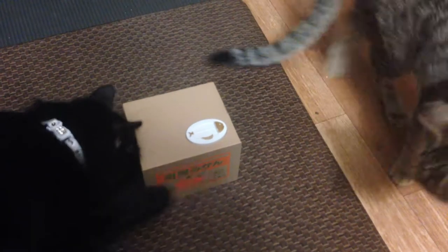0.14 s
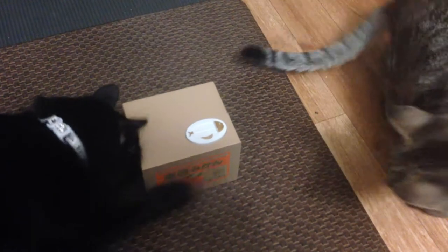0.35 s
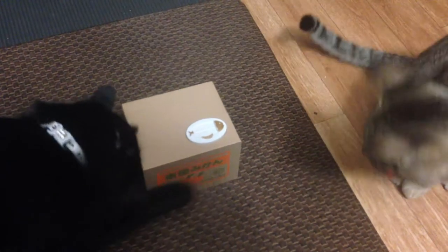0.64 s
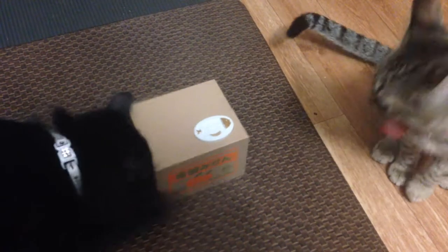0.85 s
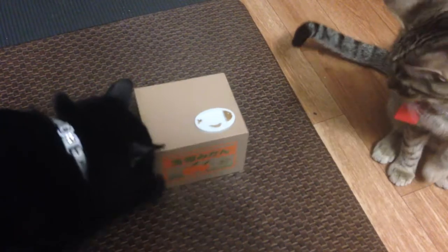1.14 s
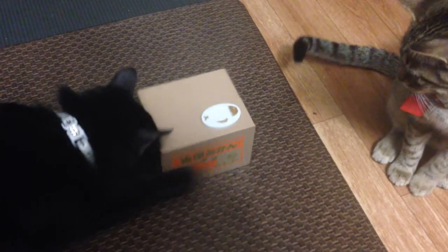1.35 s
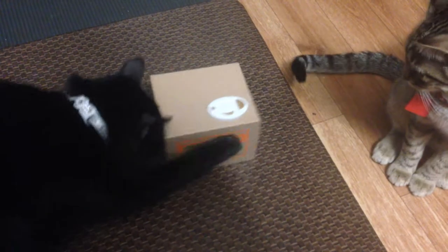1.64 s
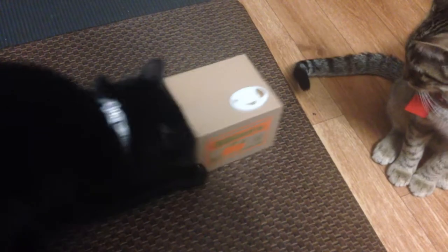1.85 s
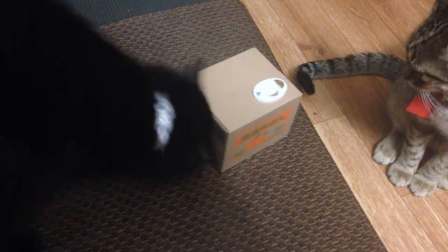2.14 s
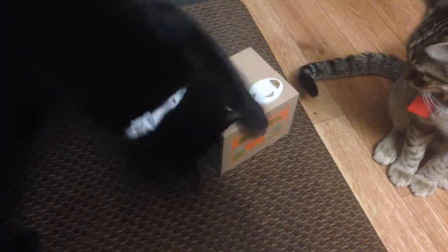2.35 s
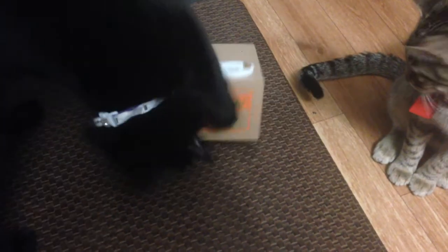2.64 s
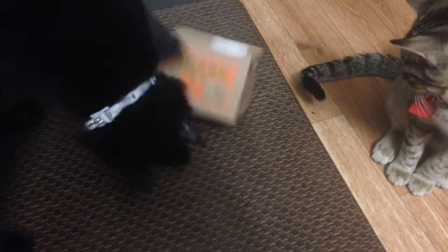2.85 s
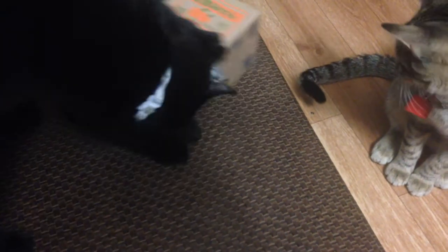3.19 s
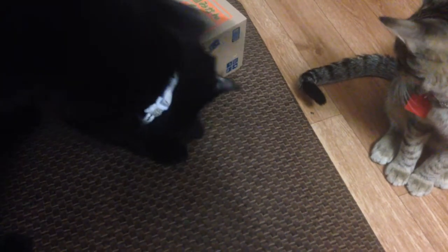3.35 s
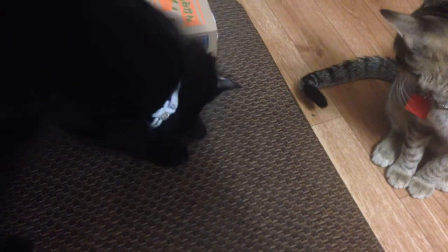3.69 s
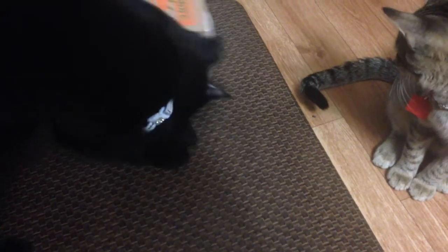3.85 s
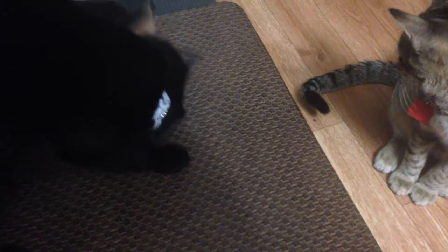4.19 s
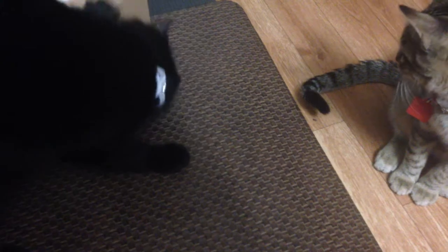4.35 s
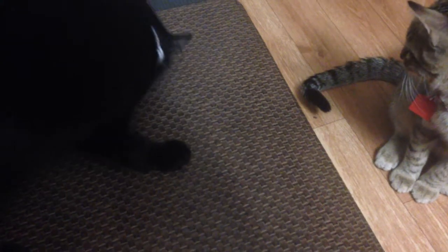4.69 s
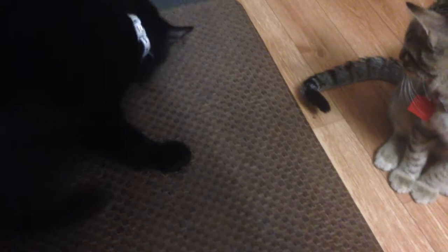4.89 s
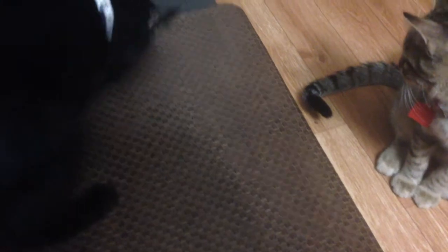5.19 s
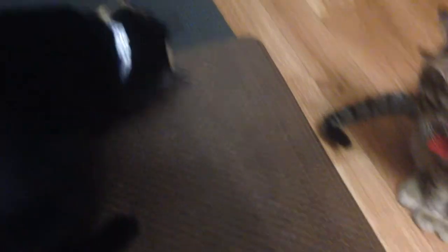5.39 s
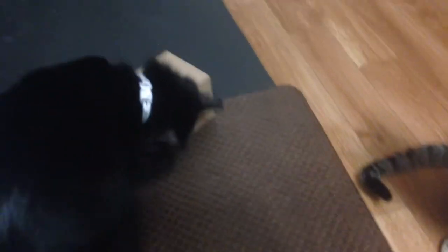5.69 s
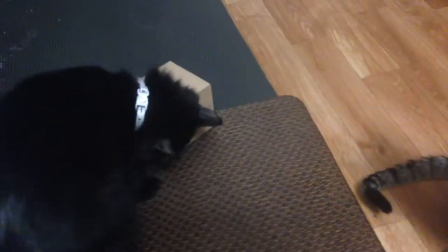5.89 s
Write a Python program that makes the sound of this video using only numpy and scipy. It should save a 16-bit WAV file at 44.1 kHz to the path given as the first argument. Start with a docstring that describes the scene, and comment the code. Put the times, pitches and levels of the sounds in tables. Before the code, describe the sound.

A small cardboard box rasps in short strokes over a woven mat, then tumbles with a hollow knock and scuffs on in a quiet room.

```python
"""A quiet room with a woven floor mat, where a cat paws and shoves a small cardboard box.
The box's bottom rasps over the weave in short strokes: clumped noise in the colours of rasp, fizz and drag.
Tipped, its edge scuffs and its walls flex; paw pats and tumbles ring its hollow body as damped modes.
The room hums low and answers each sound with a brief decaying echo; the microphone hisses faintly."""
import sys
import numpy as np
from scipy import signal
from scipy.fft import rfft, irfft, next_fast_len
from scipy.io import wavfile
from scipy.ndimage import uniform_filter1d, map_coordinates

SR = 44100
rng = np.random.default_rng(int(sys.argv[2]) if len(sys.argv) > 2 else 0)


def transcribe(signal):
    """Save signal, clipped to [-1, 1], as a 16-bit WAV file at the path in sys.argv[1]."""
    frames = np.atleast_2d(signal).T
    limited = np.clip(frames, -1, 1)
    pcm = np.round(limited * 32767).astype(np.int16)
    wavfile.write(sys.argv[1], SR, pcm)


N = 265923  # length [samples]

# scuffs of the tipped box: (start [s], rise [s], hold [s], peak level [dB], sag over the hold [dB],
# fizz [dB re rasp], wall flex [dB re rasp], hollow rumble [dB re rasp], favoured wall [Hz])
SCUFFS = [(2.02, 0.015, 0.053, -68.5, 6.5, 1, -3, -10, 5000),
          (2.494, 0.027, 0.066, -57.5, 3.5, -14, 3, 1.5, 2000),
          (2.723, 0.016, 0.068, -38, 10, -10, -32, -17, 5300),
          (2.786, 0.06, 0.049, -36.5, 6.5, -11, -24, -17, 5400),
          (2.854, 0.027, 0.013, -38, -0.5, -18.5, -18.5, -39, 3500),
          (3.062, 0.019, 0.049, -32, 14, -6, -1.5, -2, 2500), (3.165, 0.021, .02, -55, 6, -6, -5, 5, 3000),
          (3.211, 0.0054, 0.071, -50.5, 11.5, -3, -9, -1, 4200),
          (3.47, 0.0039, 0.049, -32.5, 5.5, -15, -14, -27, 3000),
          (3.555, 0.062, 0.041, -41.5, 11.5, -21, -7, -10.5, 3850),
          (3.842, 0.0075, 0.0097, -36, 13, -19, -6.5, 3, 1700), (3.88, .03, 0.069, -70, -9, -5, 4, 2, 3000),
          (3.992, .014, 0.052, -40, 6, -15, -4.5, -9.5, 4300),
          (4.213, 0.026, 0.029, -30.5, 11.5, -11.5, -2, 4.5, 3500),
          (4.265, 0.021, 0.1, -44, 17.5, -31, 0.5, -11, 3900),
          (4.37, 0.046, 0.015, -50, 6, -34, 2.5, -0.5, 1900),
          (4.42, 0.037, .04, -52.5, 13, -7, -6, -3, 4200),
          (5.439, 0.015, 0.019, -50, 13, -20, 3.5, 6, 1900),
          (5.482, .008, 0.045, -52, 18, -22, 3, 11, 1900),
          (5.575, 0.012, 0.017, -41.5, 7.5, -15, 2, 6, 2000),
          (5.66, 0.055, 0.07, -73.5, 12.5, -18, -8, 26, 2000),
          (5.82, 0.16, .03, -69.5, -3, -13, -2, 11.5, 2000)]
# air and large walls of the box: (frequency [Hz], width [Hz], relative level [dB])
HOLLOW = [(258.5, 15, -0.5), (365.5, 82, 8.5), (439.4, 181, 6.5), (557, 122, 6.5), (644, 51, 2)]


def scrape():
    """Thousands of tiny catches on the weave, in clumps, coloured by the cardboard."""
    # catches bunch as each ridge of the weave passes; some snag harder
    clumps = amp(2.2 * wobble(170) + 1.4 * wobble(45))
    snag_now = rng.random(N) < 1400 / SR  # 1400 snags a second on average
    snags = amp(2.5 * rng.standard_normal(N)) * snag_now * rng.choice([-1, 1], size=N)
    grain = rng.standard_normal(N) + 0.5 * unit(snags)
    catches = patchy(clumps * grain, depth_db=1.5, bins=3, frames=6)
    # a tipped box changes its colour as the edge shifts
    shifting = patchy(catches, depth_db=2.0, bins=2, frames=14)
    # fibre tips: (frequency [Hz], relative level per Hz [dB])
    fibre_tips = [(4000, -15), (5300, 3), (6500, 0.5), (9000, -7.5), (13000, -17), (16000, -49.5)]
    fizz = coloured(catches, fibre_tips)
    return flat_strokes(catches, fizz) + edge_scuffs(shifting, fizz)


def flat_strokes(catches, fizz):
    """The flat bottom rasps on the weave, its fibre tips fizz, and its flexing trails the force."""
    # strokes over the mat: (start [s], rise [s], hold [s], peak level [dB], sag of the rasp over the hold [dB],
    # fizz [dB re rasp], drag [dB re rasp])
    shoves = [(0.089, 0.0024, .006, -53, 2.5, -22, -4), (0.105, 0.011, 0.0093, -32, 7, -11, -14.5),
              (.305, 0.01, 0.012, -57, 1.5, -13, -8.5), (.332, 0.055, 0.049, -25, 11.5, -9, -20),
              (0.56, 0.0076, 0.0068, -51.5, 2, -10, -2), (.592, 0.047, 0.057, -26, 5.5, -10.5, -16.5),
              (0.698, 0.045, 0.059, -30.5, 3, -10.5, -19.5), (.88, 0.021, 0.036, -69.5, 2, -16, 6),
              (1.009, 0.05, 0.076, -25, 9, -10, -18), (1.300, 0.0062, 0.037, -60.5, 0.5, -11, -2.5),
              (1.337, 0.06, 0.029, -22.5, 4, -8, -25.5), (1.51, 0.029, 0.011, -50.5, 2, -11, -9.5),
              (1.661, .009, 0.011, -31.5, 9, -10, -17.5), (1.705, .05, 0.084, -25, 21, -7, -19)]
    # weave on cardboard: (frequency [Hz], relative level per Hz [dB])
    weave = [(710, -70), (1200, -48), (1420, -12), (2010, -6), (2300, 3.5), (2510, 1.5), (2830, 9),
             (3210, 8.5), (4450, 3), (8000, -28), (10400, -33), (17600, -120)]
    # flexing bottom: (frequency [Hz], relative level per Hz [dB])
    bottom = [(400, -10), (750, -10.5), (1100, 1.5), (1600, 2.5), (2200, -12.5)]
    lag_s = 0.01
    fizz_db, drag_db = np.transpose(shoves)[5:]
    rasp = summed(strokes(shoves)) * coloured(catches, weave)
    tips = summed(strokes(shoves, linger_db=-3.5), fizz_db) * fizz
    drag_gain = np.roll(summed(strokes(shoves, linger_db=2), drag_db), round(lag_s * SR))
    drag = drag_gain * coloured(catches, bottom)
    return rasp + tips + drag


def edge_scuffs(shifting, fizz):
    """The tipped box rasps on one edge, which sets its freed walls ringing and flexing."""
    # an edge on the weave: (frequency [Hz], relative level per Hz [dB])
    edge_colour = [(710, -67), (1200, 0), (1330, -44), (1580, 5), (1990, 3.5), (2650, 8.5), (3040, 2),
                   (3450, 3.5), (3980, 7.5), (4970, -3), (5420, -11), (6210, -10), (6770, -23), (8000, -24),
                   (10400, -54), (17600, -120)]
    # walls that ring once the box is off its bottom: (frequency [Hz], width [Hz], relative level [dB])
    freed_walls = [(1620, 160, -3), (2790, 130, -1), (3100, 150, 0), (3900, 140, 0), (5310, 150, -4),
                   (5760, 120, -8), (6630, 120, -11)]
    # flexing walls: (frequency [Hz], relative level per Hz [dB])
    wall_flex = [(450, 6), (750, -5), (1050, -0.5), (1500, 1.5), (2300, -23)]
    freed_db = -10.5  # re the edge's rasp
    gains = strokes(SCUFFS)
    fizz_db, flex_db = np.transpose(SCUFFS)[5:7]
    rasp = coloured(shifting, edge_colour) + amp(freed_db) * resonating(shifting, freed_walls)
    edge = unit(favoured(rasp, lift_db=6.5, octaves=0.19))
    flex = coloured(shifting, wall_flex)
    return summed(gains) * edge + summed(gains, fizz_db) * fizz + summed(gains, flex_db) * flex


def favoured(x, lift_db, octaves):
    """x lifted in a band around the wall that the latest scuff favours."""
    hz, t, z = signal.stft(x, SR, nperseg=256)
    start, *_, wall_hz = np.transpose(SCUFFS)
    latest = np.maximum(np.searchsorted(start, t) - 1, 0)
    distance = np.log2((hz[:, None] + 1) / wall_hz[latest])
    bump = np.exp(-(distance / octaves) ** 2)
    return signal.istft(z * amp(lift_db * bump), SR, nperseg=256)[1][:N]


def rocking():
    """Uneven pushes from the mat drive the hollow modes while the tipped box scuffs."""
    pushes = amp(3 * wobble(60)) * rng.standard_normal(N)
    rumble_db = np.transpose(SCUFFS)[7]
    return summed(strokes(SCUFFS), rumble_db) * resonating(pushes, HOLLOW)


def knocks():
    """Each blow cracks the walls, rings the modes near where it lands and thuds the floor."""
    # knocks: (time [s], relative crack level [dB], centre of the crack [Hz], relative hollow level [dB],
    # centre of the hollow modes [Hz], floor thud level before its modes' own levels [dB])
    blows = [(1.6642, -26, 2900, -46, 374, -54), (2.378, -36, 1100, -63, 295, -64),
             (2.4418, -39.5, 3860, -59, 357, -66), (2.5265, -31, 1140, -49.5, 363, -54),
             (3.0737, 0.5, 1980, -58, 535, -13.5), (3.0759, 1.5, 1000, -23.5, 318, -21),
             (3.2166, -26, 2400, -52, 384, -54), (3.4712, -20.5, 3390, -49, 387, -55),
             (3.482, -28, 2980, -36, 390, -48), (3.8456, -18.5, 1580, -35.5, 520, -57),
             (3.9691, -28, 5500, -48, 248, -59), (4.0035, -40, 1550, -66, 364, -58),
             (4.059, -42, 1200, -38.5, 400, -65), (4.2196, -7.5, 1730, -23, 226, -33.5),
             (4.2356, -8, 3900, -22, 458, -32.5), (4.2868, -16, 1040, -32, 466, -49),
             (4.4063, -29, 2230, -45, 458, -45), (5.1695, -39, 3000, -51, 251, -56),
             (5.4405, -43, 3030, -54, 408, -48), (5.4472, -20.5, 1800, -38.5, 410, -65),
             (5.4865, -28, 1720, -40, 550, -61), (5.5793, -45, 3850, -30.5, 258, -51),
             (5.5909, -15, 1880, -35, 550, -49)]
    # small walls: (frequency [Hz], relative level [dB], t60 [s])
    panels = [(746, 11, 0.011), (1038, -14.5, 0.088), (1773, 9.5, 0.0067), (1950, -7, 0.046),
              (2436, 7.5, 0.011), (3430, -10, .015), (4020, 10.5, 0.0097), (5300, -27, .012)]
    # floorboards: (frequency [Hz], relative level [dB], t60 [s])
    floor = [(132.3, -6.5, .12), (174.3, 1.3, 0.15), (233, -10, 0.059)]
    hollow_t60 = 0.042  # [s]
    out, t = np.zeros(N + SR), np.arange(SR // 3) / SR
    for s, crack_db, crack_hz, hollow_db, centre_hz, thud_db in blows:
        bright = np.convolve(rng.standard_normal(len(t)), [1, 0.3, -0.019, -1.2], "same")
        click = 0.97 * amp(-60 * t / 0.0047) * bright
        # many small unresolved modes: a dull puff
        dull = np.convolve(rng.standard_normal(len(t)), np.hanning(16), "same")
        puff = 0.44 * amp(-60 * t / 0.022) * dull
        wall_modes = leaning(panels + [(crack_hz, 1, 0.018)], crack_hz, per_octave_db=3.5)
        walls = amp(crack_db - 20.5) * (click + puff + ringing(wall_modes, t, spread_db=4))
        near = [(centre_hz, 3, hollow_t60)] + [(hz, db, hollow_t60) for hz, _, db in HOLLOW]
        hollow_modes = leaning(near, centre_hz, per_octave_db=16)
        hollow = amp(hollow_db + 2) * ringing(hollow_modes, t, spread_db=5.5)
        thud = amp(thud_db) * ringing(floor, t, spread_db=2.0)
        # cardboard meets softly; low modes take a few ms to build
        quick, slow = 1 - np.exp(-t / 0.000578), 1 - np.exp(-t / 0.0031)
        out[round(s * SR):][:len(t)] += quick * walls + slow * (hollow + thud)
    return out[:N]


def leaning(modes, centre_hz, per_octave_db):
    """Modes weakened by their distance from the centre that the blow favours."""
    return [(hz, db - per_octave_db * abs(np.log2(hz / centre_hz)), t60) for hz, db, t60 in modes]


def ringing(modes, t, spread_db):
    """Damped modes, each at a new strength for every blow."""
    total = 0
    for hz, db, t60 in modes:
        strength_db = db + spread_db * rng.standard_normal()
        total = total + amp(strength_db - 60 * t / t60) * np.sin(2 * np.pi * hz * t)
    return total


def pats():
    """A padded paw swells the hollow tone gently, with no crack."""
    # soft paw pats on the box: (time [s], relative level [dB], hollow tone [Hz], t60 [s])
    paw_pats = [(0.983, -21, 373, 0.017), (1.304, -27.5, 375, 0.034), (1.662, -29.5, 378, 0.025),
                (2.713, -25.5, 331, 0.074)]
    out, t = np.zeros(N + SR), np.arange(SR // 5) / SR
    swell = 1 - np.exp(-(t / 0.002) ** 2)
    for s, db, hz, t60 in paw_pats:
        out[round(s * SR):][:len(t)] += swell * ringing([(hz, db + 1, t60)], t, spread_db=3)
    return out[:N]


def room(x):
    """Each frequency of the room's answer dies at its own speed, in a random pattern of echoes."""
    # decay of the room: (frequency [Hz], t60 [s])
    decay = [(150, 0.44), (1000, 0.28), (4000, 0.18), (12000, 0.15)]
    # the echo pattern is drawn anew at random every eighth of a second
    wet, step = np.zeros(N + SR), SR // 8
    for start in range(0, N, step):
        hz, t, z = signal.stft(rng.standard_normal(SR // 2), SR, nperseg=256)
        fade = amp(-60 * t / along(decay, hz)[:, None])
        tail = signal.istft(z * fade, SR, nperseg=256)[1]
        echo = signal.fftconvolve(x[start:start + step], tail / np.linalg.norm(tail))
        wet[start + SR // 200:][:len(echo)] += echo  # first return after 5 ms
    return wet[:N]


def room_tone():
    """Low, slightly unsteady household hum and drifting deep noise over the microphone's hiss."""
    # room tone and hiss: (frequency [Hz], relative level per Hz [dB])
    hum = [(59, -30), (100, -10), (185, -1), (295, -5.5), (322, -11), (358, -5), (389, -9.5), (471, -11.5),
           (502, -13), (583, -14.5), (1830, -28.5), (14700, -38), (16000, -45)]
    # low background noise: (frequency [Hz], relative level per Hz [dB])
    deep = [(12, -50.5), (20, -17.5), (50, 7), (65, 8), (92, -4), (130, -22), (170, -45.5), (290, -120)]
    # slow random drift of the low background noise: (time [s], level [dB])
    deep_drift = [(0, -61), (.45, -54), (.7, -60.5), (1.3, -63), (2.2, -68.5), (3.05, -58.5), (4.2, -71),
                  (5, -63), (6.03, -67)]
    hum_db = -52.5
    air = patchy(rng.standard_normal(N), depth_db=1.2, bins=2, frames=14)
    deep_db = np.interp(np.arange(N) / SR, *np.transpose(deep_drift)) + 1.5 * wobble(3)
    low_noise = amp(deep_db) * coloured(rng.standard_normal(N), deep)
    return amp(hum_db) * coloured(air, hum) + low_noise


def strokes(rows, linger_db=0):
    """Gain of each row over time: a rounded rise, a sagging hold, a steady release."""
    rise_power, release_db_per_s = 1.13, 545  # how late the rise swells; how fast a stroke dies
    s, rise, hold, db, sag_db = np.transpose(rows)[:5, :, None]
    t = np.arange(0, N, 16) / SR - s  # one gain every 16 samples
    swell = np.sin(np.pi / 2 * np.clip(t / rise, 0, 1)) ** rise_power
    sag = (sag_db - linger_db) * np.clip((t - rise) / hold, 0, 1)
    release = release_db_per_s * np.maximum(t - rise - hold, 0)
    return swell * amp(db - sag - release)


def summed(gains, db=0):
    """Overlapping strokes add in power; one gain per sample."""
    total = np.sqrt(np.sum((gains * amp(db).reshape(-1, 1)) ** 2, axis=0))
    return np.interp(np.arange(N), np.arange(0, N, 16), total)


def resonating(x, peaks):
    """x through a set of resonances of alternating sign, at rms 1."""
    def body(f):
        total = 0
        for k, (centre, width, db) in enumerate(peaks):
            peak = 1j * f * width / (centre ** 2 - f ** 2 + 1j * f * width)
            total = total + (-1) ** k * amp(db) * peak
        return total
    return unit(filtered(x, body))


def patchy(x, depth_db, bins, frames):
    """x with random patches of gain over time and frequency."""
    z = signal.stft(x, nperseg=256)[2]
    field = uniform_filter1d(rng.standard_normal(z.shape), size=bins, axis=0)
    field = uniform_filter1d(field, size=frames, axis=1)
    return signal.istft(z * amp(depth_db * unit(field)), nperseg=256)[1][:N]


def wobble(rate):
    """A smooth random curve, rate knots a second."""
    knots = rng.standard_normal(int(N * rate / SR) + 4)
    return map_coordinates(knots, [np.arange(N) * rate / SR])


def coloured(x, spectrum):
    """x with the given spectrum, at rms 1."""
    return unit(filtered(x, lambda hz: amp(along(spectrum, hz))))


def filtered(x, response):
    """x times a response of frequency."""
    m = next_fast_len(N + 8192)
    return irfft(rfft(x, m) * response(np.fft.rfftfreq(m, 1 / SR)), m)[..., :N]


def along(points, hz):
    """(frequency [Hz], value) points read on a log frequency axis."""
    f, v = np.transpose(points)
    return np.interp(np.log(hz + 1), np.log(f + 1), v)


def unit(x):
    """x at rms 1."""
    return x / np.sqrt(np.mean(x ** 2) + 1e-20)


def amp(db):
    """Gain of a level in dB."""
    return 10 ** (np.asarray(db) / 20)


def scene():
    """Box sounds, their reverberation and the room tone."""
    rubbing = scrape() + rocking()
    blows = knocks() + pats()
    wet = room(amp(-10.5) * rubbing + amp(-15.5) * blows)
    return (rubbing + blows + wet + room_tone())[None]


def record(dry):
    """The microphone loses the deepest bass; nothing is kept above the band limit."""
    bass_hz, top_hz = 40, 15450
    return filtered(dry, lambda hz: (1j * hz / (bass_hz + 1j * hz)) ** 2 * (hz < top_hz))


dry = scene()
out = record(dry)
transcribe(out)
```